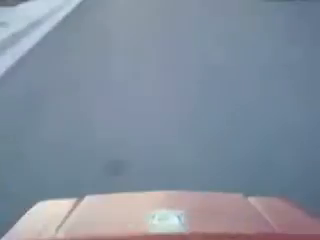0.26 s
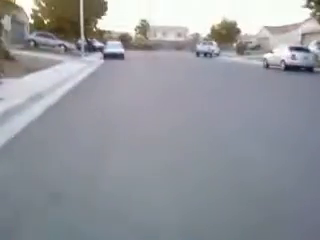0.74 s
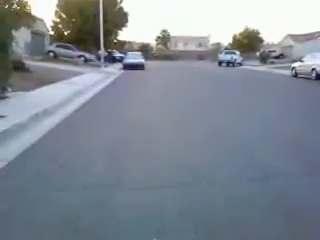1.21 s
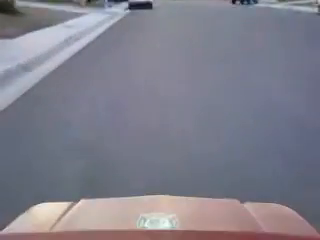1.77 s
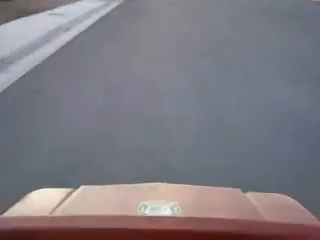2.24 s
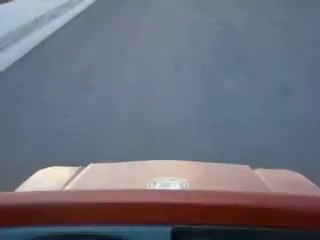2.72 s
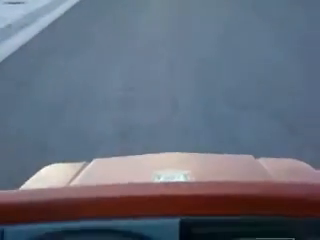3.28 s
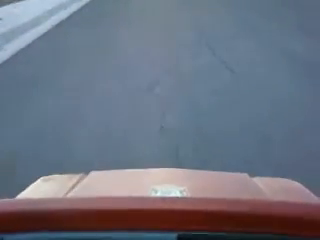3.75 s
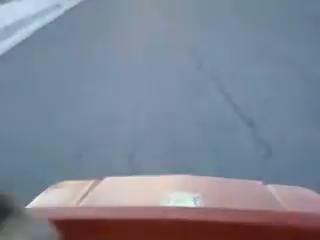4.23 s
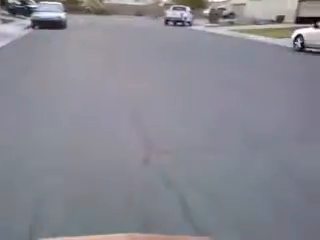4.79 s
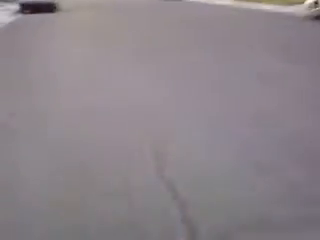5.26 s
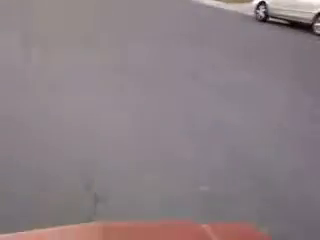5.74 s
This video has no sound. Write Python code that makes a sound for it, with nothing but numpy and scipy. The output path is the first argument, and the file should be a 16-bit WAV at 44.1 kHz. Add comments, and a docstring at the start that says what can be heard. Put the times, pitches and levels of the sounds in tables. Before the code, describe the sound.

A small electric ride-on car hums and whines unevenly along asphalt, hollow plastic wheels crunching and gears rattling, with occasional sharp body knocks.

```python
"""A child's electric ride-on car on an asphalt street, heard from on board; the sound is narrow-band, little
above 3.5 kHz. At once motor orders hum in the plastic body, and noise taps make the hollow wheels ring above a
rumble. The first knocks, noise bursts through panel resonances, come early; a toothed whine grows in the first
second. Both drives surge with each turn of an off-centre gear, above rattling teeth; the loudest peaks clip.
Near five seconds a high scraping chatter and more knocks come, the hum weakens and the wheels crunch hardest."""
import sys
import numpy as np
from scipy import signal
from scipy.fft import rfft, irfft
from scipy.io import wavfile

SR = 44100
rng = np.random.default_rng(int(sys.argv[2]) if len(sys.argv) > 2 else 0)


def file_out(sig):
    """Save sig as 16-bit WAV at sys.argv[1]."""
    # one column per channel
    cols = np.atleast_2d(sig).T
    # limit, then scale
    lim = np.clip(cols, -1, 1)
    pcm = np.round(lim * 32767).astype(np.int16)
    wavfile.write(sys.argv[1], SR, pcm)


N = 264600
TIME = np.arange(N) / SR  # seconds

# Boom of the body. Each row: time in seconds, level of the fourth motor order in dB.
BODY_HUM = [(0, -17.5), (1.0, -17), (1.4, -15.5), (1.95, -17.5), (2.3, -15.5), (3.0, -16.5), (3.7, -15),
            (4.3, -16.5), (4.65, -14.5), (5.05, -18.5), (5.45, -22), (6.0, -22.5)]
# Gearbox. Each row: time in seconds, whine before the cover resonance in dB, tooth rattle in dB.
GEARBOX_LEVELS = [(0, -34.5, -25), (.45, -29.5, -26), (.7, -25, -25), (1.4, -24.3, -23.5),
                  (2.1, -25, -22.5), (2.85, -22.5, -24), (3.85, -30, -22.5), (4.15, -22, -22.5),
                  (4.5, -30, -22.5), (4.9, -28.5, -20.5), (5.3, -28, -24.5), (5.55, -27.5, -20.5),
                  (6.0, -23, -23)]
# Resonances of the gearbox housing. Each row: frequency in Hz, width in Hz, relative gain in dB.
HOUSING_MODES = [(1630, 300, -2), (2684, 310, 0), (2970, 330, 0), (3282, 250, 1)]
# Knocks of the body, with one longer high scraping chatter near 4.9 s. Each row: moment of the peak in seconds,
# level in dB, time from the peak to 1/e of it in seconds, favoured panel pitch in Hz.
KNOCKS_AND_CHATTER = [(0.212, -13.5, 0.012, 1250), (0.219, -14, 0.0068, 2950), (0.404, -18, 0.022, 710),
                      (0.589, -18, 0.016, 1500), (2.089, -17.5, 0.014, 820), (3.909, -17, 0.022, 790),
                      (4.328, -10.5, 0.0044, 810), (4.907, -22, 0.041, 3020), (5.062, -17.5, 0.016, 735),
                      (5.183, -18, 0.016, 2170), (5.214, -12, 0.01, 1400), (5.37, -19, 0.0069, 820)]
# Resonances of the plastic panels. Each row: frequency in Hz, width in Hz, relative gain in dB.
PANEL_MODES = [(536, 83, 1), (830, 150, -1.5), (1136, 130, -4), (1417, 130, -2.5), (2207, 250, -2),
               (2740, 280, -3.5), (3060, 190, 1.5)]
# Wheels on asphalt. Each row: time in seconds, level in dB.
ROAD_LEVEL = [(0, -21.5), (0.8, -21.5), (2.7, -21), (3.9, -21), (5.0, -20.5), (5.4, -17.5), (6.0, -20)]
# Resonances of the hollow wheels. Each row: frequency in Hz, width before widening in Hz, relative gain in dB.
HOLLOW_WHEEL_MODES = [(452, 147, 1), (587.6, 146, 0), (833, 138, 1.5), (1130, 265, -3), (1365, 322, -1),
                      (2041, 420, -4)]
# Rumble spectrum of the plastic shell. Each row: frequency in Hz, relative density in dB per Hz.
SHELL_SPECTRUM = [(20, -26), (80, -7), (160, -5.5), (250, 1), (350, 6), (450, 6.5), (560, -4.5),
                  (800, -19.5), (2000, -51.5)]
# Narrow pass band. Each row: frequency in Hz, gain in dB.
NARROW_BAND = [(20, 1), (3480, -0.5), (3620, -2), (4000, -9.0), (4450, -21.0), (5000, -71.0), (20000, -94.5)]

# Drives
MOTOR_HZ, TOOTH_HZ = 101.13, 1696  # full-speed shaft rate of the humming drive, tooth rate of the whining one
PINION_TEETH = 16
GEAR_TURN_HZ = 6.51
HUM_LEAD, WHINE_LEAD = -.03, .44  # where each off-centre gear starts (turns)
HUM_SURGE, WHINE_SURGE = .013, .03003  # speed swing per gear turn, the whining one at the start (share of speed)
SURGE_GROWTH_PER_S = .088  # the whining drive swings wider as the ride goes on
HUM_SLIP, WHINE_SLIP = .016, .009  # rms random wavering of each drive (share of speed)
START_SAG, PICKUP_S = .011, .9  # the car gains its last bit of speed (share, time constant)

# Hum
THIRD_DB, THIRD_FOLLOW = -21.5, .5  # third order: mean level, dB per dB of the fourth
THIRD_THROB_DB, THIRD_THROB_LEAD = 1.5, .33  # it throbs once per gear turn (dB, turns)
SECOND_HUM_DB = -10  # fourth order of the whining drive, relative to that of the humming drive
HUM_WAVER_DB, HUM_WAVER_HZ = 1.83, 7

# Gears
COVER_HZ, COVER_HALF_WIDTH_HZ = 1720, 140  # resonance of the gear cover
WHINE_WAVER_DB, WHINE_WAVER_HZ = 1.5, 6.5
PINION_DB, OCTAVES_DB = -32.5, -8.5  # level of the pinion; each octave relative to the rattle
RATTLE_WAVER_DB, RATTLE_WAVER_HZ = .87, 7.9

# Body, wheels and band limit
PANEL_FAVOUR_DB_PER_OCTAVE = 11  # how much weaker the other panels answer
TAPS_PER_S = 3000  # mean rate for each wheel resonance
WHEEL_WIDENING = 1.59  # compensates for passing each resonance twice
SHELL_DB = -22
CLIP_LEVEL, TOP_HZ = .71, 15900  # amplitude limit, upper band edge


def undb(db):
    """Level as amplitude: 20 dB is a gain of ten."""
    return 10 ** (np.asarray(db) / 20)


def unit(x):
    """Normalization: the mean power becomes 1."""
    return x / np.sqrt(np.mean(x ** 2))


def curves(table):
    """Linear interpolation: the columns of a table are joined by straight lines in time."""
    times, *columns = np.transpose(table)
    return [np.interp(TIME, times, column) for column in columns]


def colour(x, points):
    """Spectral shaping: dB points joined along log frequency weight the spectrum, at rms 1."""
    hz, db = np.transpose(points)
    bins = np.maximum(np.fft.rfftfreq(N, 1 / SR), 1)
    gain = undb(np.interp(np.log(bins), np.log(hz), db))
    return unit(irfft(rfft(x) * gain, N))


def ring(x, modes):
    """Modal superposition: parallel resonances add with alternating sign."""
    total = np.zeros(N)
    for k, (hz, width, db) in enumerate(modes):
        b, a = signal.iirpeak(hz, hz / width, fs=SR)
        total += (-1) ** k * undb(db) * signal.lfilter(b, a, x)
    return total


def flutter(hz):
    """Low-passed noise: a random wavering of rms 1, mostly slower than hz."""
    slow = signal.lfilter(*signal.butter(1, hz, fs=SR), rng.standard_normal(N))
    return unit(signal.lfilter(*signal.butter(1, 4 * hz, fs=SR), slow))


def gear_swing(lead):
    """Eccentric rotation: one swing between -1 and 1 per turn of an off-centre gear."""
    return np.cos(2 * np.pi * (GEAR_TURN_HZ * TIME + lead))


def turns(hz, depth, lead, slip, slip_hz):
    """Phase as summed speed: a drive settles at full speed while its off-centre gear modulates it."""
    settling = 1 - START_SAG * np.exp(-TIME / PICKUP_S)
    modulation = 1 + depth * gear_swing(lead) + slip * flutter(slip_hz)
    return np.cumsum(hz * settling * modulation) / SR


def partial(cycles, order, rough, rough_hz):
    """Random modulation: play in the gears shakes the strength and timing of a tone of rms 1."""
    shake = 1 + rough * (flutter(rough_hz) + 1j * flutter(rough_hz))
    rotation = np.exp(2j * np.pi * (order * cycles + rng.random()))
    return unit(np.real(shake * rotation))


def motor_hum(shaft, mesh):
    """Harmonic excitation and beating: the body booms on motor orders three and four of unlike drives."""
    fourth_db, = curves(BODY_HUM)
    third_db = THIRD_DB + THIRD_FOLLOW * (fourth_db - fourth_db.mean())
    third_db = third_db + THIRD_THROB_DB * gear_swing(THIRD_THROB_LEAD)
    third = partial(shaft, order=3, rough=.26, rough_hz=16)
    fourth = partial(shaft, order=4, rough=.17, rough_hz=18)
    # the fourth order beats against that of the whining drive
    other = partial(mesh / PINION_TEETH, order=4, rough=.17, rough_hz=18)
    hum = np.zeros(N)
    for db, tone in [(third_db, third), (fourth_db, fourth + undb(SECOND_HUM_DB) * other)]:
        waver = undb(HUM_WAVER_DB * flutter(HUM_WAVER_HZ))
        hum += undb(db) * unit(tone * waver)
    return hum


def gear_whine(shaft, mesh):
    """Tooth meshing and resonance: both drives sing at their tooth rates, with octaves, out of step."""
    whine_db, rattle_db = curves(GEARBOX_LEVELS)
    # the whine swells whenever the tooth rate passes through a resonance of the gear cover
    tooth_rate = np.gradient(mesh) * SR
    swell = 1 / np.hypot(1, (tooth_rate - COVER_HZ) / COVER_HALF_WIDTH_HZ)
    whine = swell * partial(mesh, order=1, rough=.6, rough_hz=30)
    # the pinion of the humming drive sings a little lower
    pinion = partial(shaft, order=PINION_TEETH, rough=.9, rough_hz=20)
    octaves = partial(mesh, order=2, rough=.8, rough_hz=25)
    octaves += partial(shaft, order=2 * PINION_TEETH, rough=.9, rough_hz=25)
    waver_db = WHINE_WAVER_DB * flutter(WHINE_WAVER_HZ)
    return (undb(whine_db + waver_db) * whine + undb(PINION_DB) * pinion
            + undb(rattle_db + OCTAVES_DB) * octaves)


def gear_rattle(shaft):
    """Modulated noise: loose teeth drive the housing modes, hardest once per motor turn."""
    _, rattle_db = curves(GEARBOX_LEVELS)
    load = undb(1.8 * np.cos(2 * np.pi * shaft) + RATTLE_WAVER_DB * flutter(RATTLE_WAVER_HZ))
    rattle = np.zeros(N)
    for mode in HOUSING_MODES:
        strength = undb(2.1 * flutter(15))  # each resonance comes and goes
        rattle += strength * ring(load * rng.standard_normal(N), [mode])
    return undb(rattle_db) * unit(rattle)


def knocks_and_chatter():
    """Transient excitation: noise bursts sound loose panels, each favouring those near one pitch."""
    out = np.zeros(N)
    for peak_s, db, length, favoured_hz in KNOCKS_AND_CHATTER:
        panels = []
        for hz, width, gain_db in PANEL_MODES:
            octaves_away = abs(np.log2(hz / favoured_hz))
            panels.append((hz, width, gain_db - PANEL_FAVOUR_DB_PER_OCTAVE * octaves_away))
        envelope = np.exp(-((TIME - peak_s) / length) ** 2)
        out += undb(db) * envelope * unit(ring(rng.standard_normal(N), panels))
    return out


def wheel_crunch():
    """Impact excitation: stones of the asphalt tap the resonances of the hard hollow wheels."""
    road_db, = curves(ROAD_LEVEL)
    crunch = np.zeros(N)
    for hz, width, db in HOLLOW_WHEEL_MODES:
        hit = rng.random(N) < TAPS_PER_S / SR
        taps = hit * rng.standard_normal(N) * undb(1.5 * rng.exponential(size=N))
        # each wheel resonance swells and fades at random, independently of the others
        swell = undb(1.6 * flutter(12))
        mode = [(hz, WHEEL_WIDENING * width, 0)]
        # applied twice for steep sides
        crunch += undb(db) * swell * ring(ring(taps, mode), mode)
    return undb(road_db) * unit(crunch)


def shell_rumble():
    """Broadband vibration: shaped steady noise is the rumble of the plastic shell."""
    return undb(SHELL_DB) * colour(rng.standard_normal(N), SHELL_SPECTRUM)


def scene():
    """Superposition: drives, body and wheels add, all close to the microphone."""
    whine_surge = WHINE_SURGE * (1 + SURGE_GROWTH_PER_S * TIME)
    shaft = turns(MOTOR_HZ, HUM_SURGE, HUM_LEAD, HUM_SLIP, slip_hz=9)
    mesh = turns(TOOTH_HZ, whine_surge, WHINE_LEAD, WHINE_SLIP, slip_hz=14)
    drives = motor_hum(shaft, mesh) + gear_whine(shaft, mesh) + gear_rattle(shaft)
    return (drives + knocks_and_chatter() + wheel_crunch() + shell_rumble())[None]


def record(dry):
    """Band limitation and clipping: the sound is narrowed to below about 4 kHz and the loudest peaks flatten."""
    hz, db = np.transpose(NARROW_BAND)
    gain = undb(np.interp(np.fft.rfftfreq(N, 1 / SR), hz, db))
    narrow = irfft(rfft(dry) * gain, N)
    clipped = np.clip(narrow, -CLIP_LEVEL, CLIP_LEVEL)
    low_pass = signal.ellip(8, .2, 70, TOP_HZ, fs=SR, output="sos")  # order, ripple dB, stop band dB
    return signal.sosfilt(low_pass, clipped)


dry = scene()
out = record(dry)
file_out(out)
```